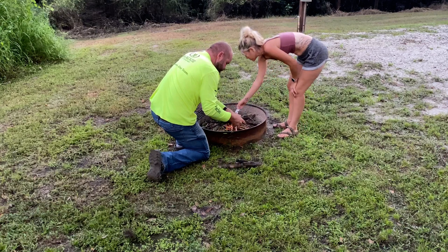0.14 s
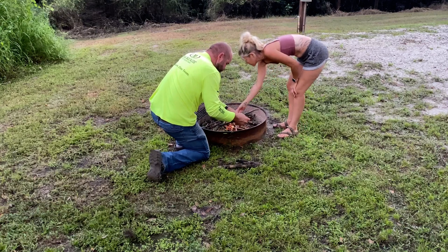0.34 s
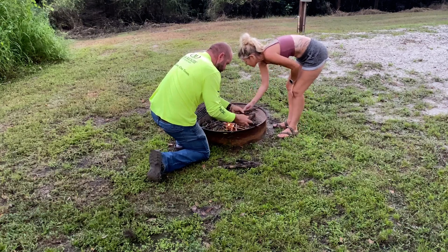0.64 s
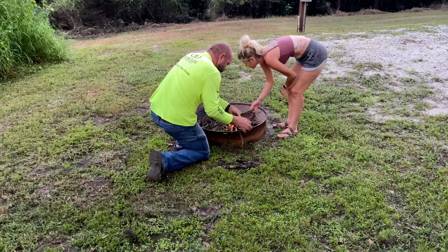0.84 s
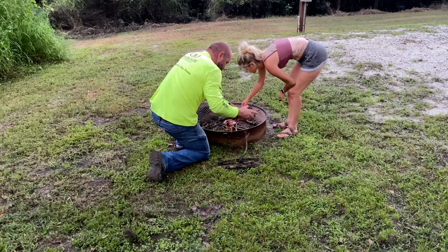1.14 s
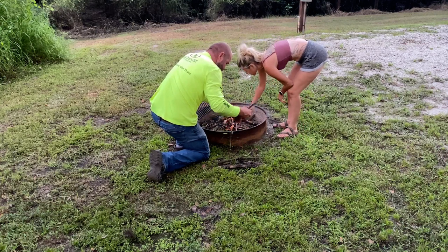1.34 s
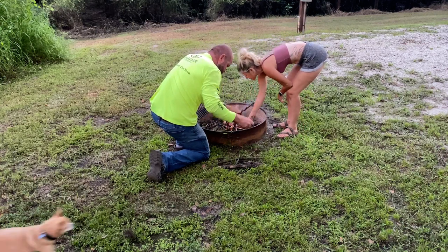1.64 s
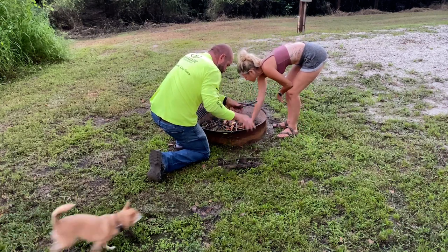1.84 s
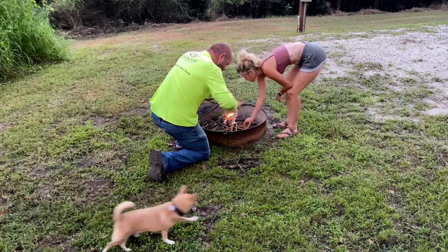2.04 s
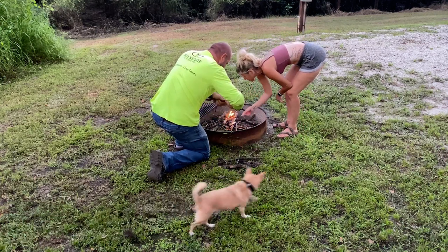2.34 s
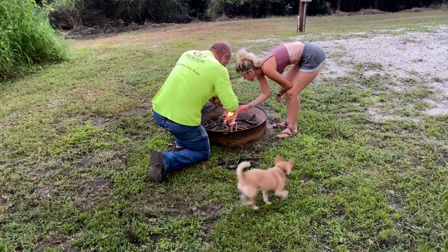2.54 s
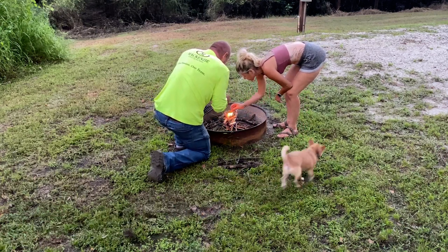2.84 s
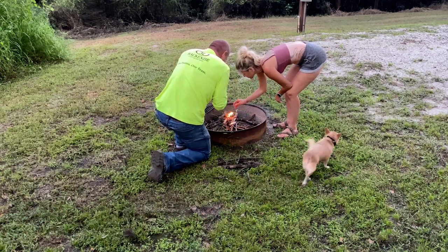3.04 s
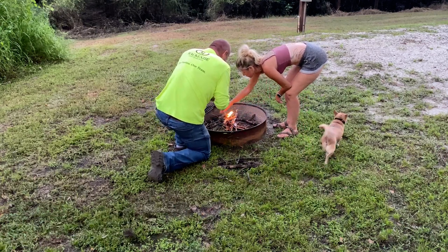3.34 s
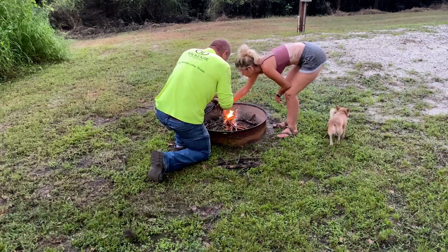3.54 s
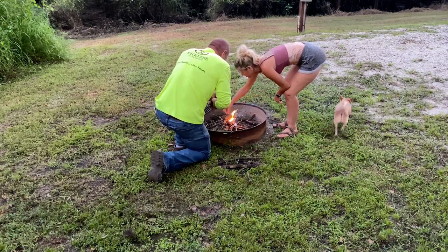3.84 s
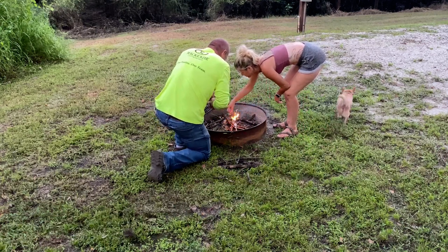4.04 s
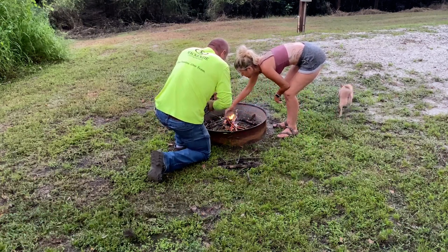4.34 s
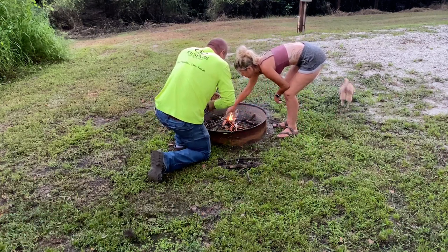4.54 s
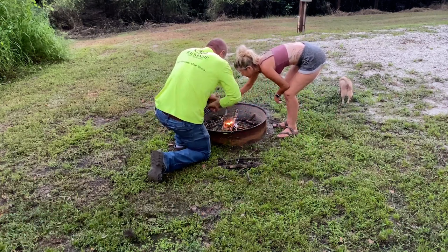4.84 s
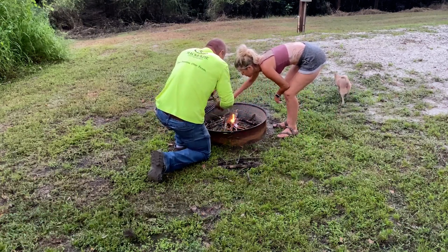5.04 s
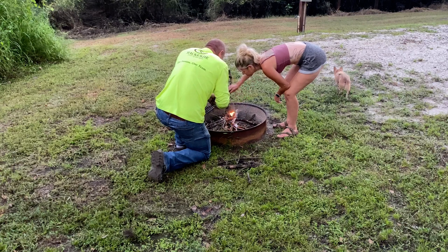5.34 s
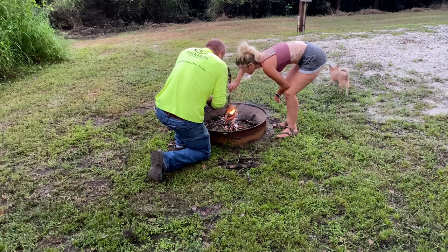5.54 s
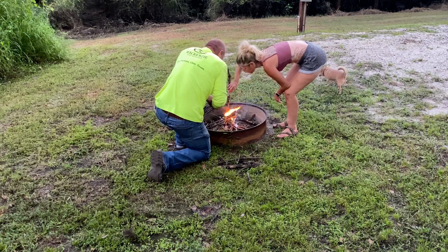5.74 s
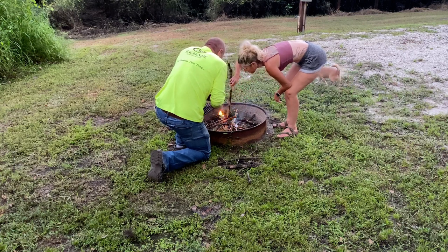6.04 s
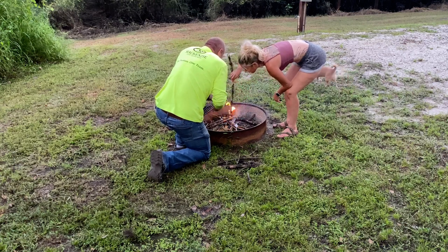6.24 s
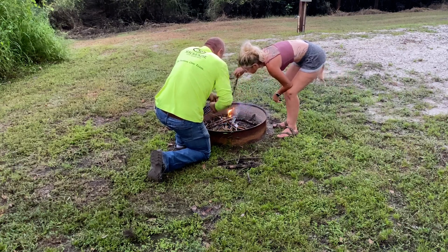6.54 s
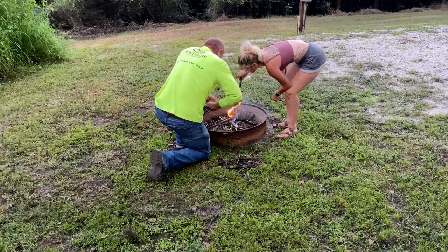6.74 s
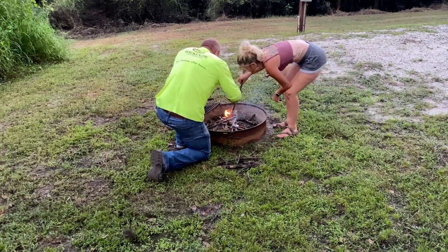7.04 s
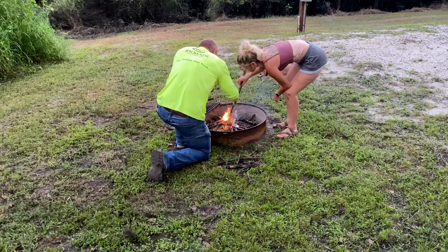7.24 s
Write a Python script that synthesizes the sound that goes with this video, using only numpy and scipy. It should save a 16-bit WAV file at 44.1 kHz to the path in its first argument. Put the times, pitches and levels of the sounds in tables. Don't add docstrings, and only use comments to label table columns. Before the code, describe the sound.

Outdoors at evening, a dense high insect chorus continues as hands rustle sticks at a small fire, with three loud wooden cracks.

```python
import sys
import numpy as np
from scipy import signal
from scipy.fft import rfft, irfft, next_fast_len
from scipy.io import wavfile

SR = 44100
rng = np.random.default_rng(int(sys.argv[2]) if len(sys.argv) > 2 else 0)


def master_out(mix):
    frames = np.transpose(np.atleast_2d(mix))
    ceiling = np.clip(frames, -1, 1)
    pcm = np.round(ceiling * 32767).astype(np.int16)
    wavfile.write(sys.argv[1], SR, pcm)


def volts_from_decibels(level):
    exponent = np.asarray(level, float) / 20
    return 10 ** exponent


N = 325281
TIME_S = np.arange(N) / SR
SIZE = next_fast_len(N + 4096)
HZ = np.arange(SIZE // 2 + 1) * SR / SIZE


def in_time(rows):
    at_s, level_db = np.transpose(rows)
    return np.interp(TIME_S, at_s, level_db)


def rms_one(x):
    return x / np.sqrt(np.mean(x ** 2) + 1e-20)


def drift(rate_hz):
    knots = rng.standard_normal(int(N / SR * rate_hz) + 2)
    return np.interp(TIME_S * rate_hz, np.arange(len(knots)), knots)


def colour(x, points):
    hz, level_db = np.transpose(points)
    log_gain = np.interp(np.log(HZ + 1), np.log(hz), level_db) * np.log(10) / 20
    cepstrum = irfft(log_gain, SIZE)
    cepstrum[1:SIZE // 2] *= 2
    cepstrum[SIZE // 2 + 1:] = 0
    return irfft(rfft(x, SIZE) * np.exp(rfft(cepstrum)), SIZE)[..., :N]


def resonance(x, hz, width_hz):
    r = np.exp(-np.pi * width_hz / SR)
    poles = [1, -2 * r * np.cos(2 * np.pi * hz / SR), r * r]
    return signal.lfilter([(1 - r * r) / 2, 0, (r * r - 1) / 2], poles, x)


def late(x, delay_s):
    return np.interp(np.arange(N) - delay_s * SR, np.arange(N), x)


def spread(pan_db):
    return volts_from_decibels(np.array([[pan_db / 2], [-pan_db / 2]]))


def field(points, alike, pan_db):
    shared, left, right = rng.standard_normal((3, N))
    pair = np.sqrt(alike) * shared + np.sqrt(1 - alike) * np.array([left, right])
    return rms_one(colour(pair, points)) * spread(pan_db)


def burst(start_s, t60_s, length=4096):
    at = round(start_s * SR)
    n = np.arange(min(length, N - at))
    return at + n, volts_from_decibels(-60 * n / SR / max(t60_s, 1e-3))


# start_s, level_db
TRAFFIC_LEVEL = [(0, -41.5), (.3, -45.5), (.95, -48.5), (1.9, -45.5), (3.4, -47.5), (4.6, -48), (7.0, -46),
                 (7.38, -46.5)]
# pitch_hz, level_db (per Hz)
RUMBLE_SPECTRUM = [(20, -47), (32, -33), (54, -7.5), (63, -14.5), (81, -0.5), (128, -2), (165, -11.5),
                   (220, -20), (250, -17), (330, -28), (420, -33), (600, -41.5), (900, -91.5)]


def distant_rumble():
    return volts_from_decibels(in_time(TRAFFIC_LEVEL) + 3.5) * field(RUMBLE_SPECTRUM, alike=0.96, pan_db=-1.1)


# pitch_hz, level_db (per Hz)
FAR_CHORUS_SPECTRUM = [(1700, -42.5), (2200, -37), (2600, -21), (3000, -17), (3800, -2), (4350, -9),
                       (5000, -10), (5600, -15), (7000, -25), (8500, -33.5), (9500, -43.5)]


def far_chorus(swell_db):
    chorus = volts_from_decibels(swell_db - 4.0) * field(FAR_CHORUS_SPECTRUM, alike=0.046, pan_db=-1.5)
    from_wall = np.array([late(chorus[0], .00776), late(chorus[1], .00757)])
    return chorus + volts_from_decibels(-6.5) * from_wall


# pitch_hz, width_hz, level_db (rms), pan_db (left-right)
FLANK_INSECTS = [(2805, 30, -69, -1.1), (2906, 38, -59, -5), (3026, 95, -51.1, -3.5), (3070, 48, -57.4, -8),
                 (3168, 89, -52.5, -3), (3313, 38, -55, -2.5), (3430, 58, -51, 10), (3570, 76, -45.4, -0.7),
                 (3670, 63, -45, -2.1), (3797, 52, -51, 9), (3830, 46, -49, -4.1), (3970, 57, -47.5, 3),
                 (4050, 95, -51, 15.8), (4170, 48, -52, -1.5), (4631, 66, -58, 4.5), (4750, 63, -53, 2.1),
                 (4931, 28, -55, 5), (5069, 250, -48, 7), (5270, 250, -53, 9), (5465, 300, -56.5, 2)]
# pitch_hz, width_hz, level_db (rms), pan_db
AHEAD_INSECTS = [(2654, 45, -62, -4.7), (2758, 41, -66, -6), (3256, 40, -56, -6), (3870, 60, -54, -5.5),
                 (4155, 30, -53.5, 7), (4314, 110, -54.5, 5), (4510, 139, -57, 10), (4570, 40, -54.5, -3),
                 (4720, 73, -53, 5), (4870, 57, -50.4, 7.5)]


def near_singers(clicks_per_s, waver_db):
    rows = [(*row, 115 * np.sign(row[3])) for row in FLANK_INSECTS]
    rows += [(*row, 2 * row[3]) for row in AHEAD_INSECTS]
    count = int(clicks_per_s * N / SR)
    out = np.zeros((2, N))
    for pitch_hz, width_hz, level_db, pan_db, lag_us in rows:
        clicks = np.bincount(rng.integers(0, N, count), rng.standard_normal(count), N)
        body = resonance(resonance(clicks, pitch_hz, width_hz), pitch_hz, width_hz)
        song = rms_one(body) * volts_from_decibels(level_db + waver_db * drift(0.934))
        out += spread(pan_db) * [song, late(song, lag_us * 1e-6)]
    return out


# start_s, level_db
CHORUS_SWELL = [(0, -35.5), (4.3, -34.5), (5.1, -34), (7.38, -34.5)]


def cicadas():
    swell_db = in_time(CHORUS_SWELL)
    near_gain = volts_from_decibels(swell_db - swell_db.mean() + 0.95)
    return near_gain * near_singers(clicks_per_s=3000, waver_db=2.5) + far_chorus(swell_db)


# start_s, level_db
BUSTLE_LEVEL = [(0, -68.5), (.4, -77), (1.8, -72.5), (2.3, -78), (3.1, -74), (3.5, -84), (4.3, -90),
                (5.05, -78), (6.3, -90), (6.7, -79), (7.38, -79)]
# pitch_hz, level_db (per Hz)
RUSTLE_SPECTRUM = [(300, -4), (450, 5.5), (700, -4), (1100, -2), (1600, -8), (2100, 0), (2800, -19.5)]


def rustle():
    level_db = in_time(BUSTLE_LEVEL) + 4.0 + 2.8 * drift(12)
    return volts_from_decibels(level_db) * field(RUSTLE_SPECTRUM, alike=0.11, pan_db=1.2)


# pitch_hz, level_db (per Hz)
HISS_SPECTRUM = [(5000, -42), (6500, 2), (8000, 6), (10000, 3.5), (12000, 0.5), (14000, 1.5), (15800, -6),
                 (16600, -32)]


def fire_hiss():
    flare_db, flare_s = 4, 0.11
    since_s = TIME_S - np.array(TEARING)[1:, :1]
    flare = np.max((since_s > 0) * np.exp(-np.abs(since_s) / flare_s), axis=0)
    level_db = -61 + flare_db * flare + 3 + .8 * drift(9)
    return volts_from_decibels(level_db) * field(HISS_SPECTRUM, alike=.93, pan_db=0)


# start_s, level_db (peak), pitch_hz, t60_s, pan_db (left-right)
KNOCKS_WITH_DECAY = [(0.028, -38.5, 330, 0.048, -9.5), (1.52, -44.5, 750, 0.018, 1), (3.5, -55, 290, 0.044, -5),
                     (4.649, -41.5, 740, 0.035, -3), (5.15, -58, 800, 0.034, -3), (1.23, -56, 1830, .04, 0),
                     (3.508, -50, 1860, 0.02, 0), (3.905, -52.5, 1900, .03, 0), (6.654, -58, 1200, 0.033, 0),
                     (6.672, -49, 1960, 0.032, 0), (3.693, -49, 1080, 0.052, 9), (.55, -60, 2000, .05, 0)]
# start_s, level_db (peak), pitch_hz, pan_db (left-right)
STICK_KNOCKS = [(0.017, -45, 1360, 9), (0.032, -48, 1050, 2), (0.277, -60, 1150, 4),
                (0.542, -53, 1790, 1.0), (0.567, -46, 1840, 8), (0.736, -52, 1150, 9),
                (0.752, -46, 2090, 0), (0.923, -46, 1190, -6), (1.389, -53, 980, 5), (1.475, -59, 1010, 9),
                (1.496, -54, 1146, -2), (1.517, -42, 2150, -7), (1.764, -45, 1950, 0.5),
                (1.884, -52, 764, -7), (2.787, -52, 1830, 0), (3.2, -57, 2360, 0.0),
                (3.507, -53, 2070, -1.0), (5.148, -55, 1100, 3), (5.15, -57, 2100, 0), (5.4, -60, 1200, 0),
                (6.471, -37.5, 2590, -9), (6.472, -50, 900, 0), (6.518, -48, 2310, 0.5),
                (6.662, -44.5, 1750, -7), (7.172, -53, 2400, 0.5)]


def knocks():
    knock_t60_s = 0.02
    rows = KNOCKS_WITH_DECAY + [(s, peak_db, hz, knock_t60_s, pan) for s, peak_db, hz, pan in STICK_KNOCKS]
    out = np.zeros((2, N))
    noise = rng.standard_normal((len(rows), 4096))
    for (start_s, peak_db, pitch_hz, t60_s, pan_db), draw in zip(rows, noise):
        at, fall = burst(start_s, t60_s)
        blow = fall * (1 - fall ** 2.0) * draw[:len(at)]
        ring = resonance(blow, pitch_hz, 200)
        ring = ring + 0.27 * resonance(blow, 0.63 * pitch_hz, 260)
        ring = ring - 0.2 * resonance(blow, 1.43 * pitch_hz, 440)
        out[:, at] += volts_from_decibels(peak_db + 1.5) * spread(pan_db) * ring / np.abs(ring).max()
    return out


# start_s, t60_s, grains_per_s, level_db
TEARING = [
    (0.0, 0.17, 3500, -53),
    (2.531, 0.14, 5400, -46.5),
    (3.63, .25, 4500, -49.5),
    (3.68, 0.14, 7500, -45),
    (4.648, 0.21, 6100, -41),
    (4.683, 0.2, 3700, -50),
    (6.47, 0.67, 1900, -56),
    (6.651, .1, 2000, -46.5),
]


def tears():
    out, chance = np.zeros(N), rng.random(N)
    sizes = volts_from_decibels(3.5 * rng.exponential(1, N).clip(0, 4)) * rng.choice([-1, 1], N)
    for start_s, t60_s, grains_per_s, level_db in TEARING:
        at, fall = burst(start_s, t60_s, length=16384)
        lets_go = chance[at] < grains_per_s / SR
        out[at] += volts_from_decibels(level_db + 21) * fall * sizes[at] * lets_go
    return out


# start_s, level_db (peak), middle_db, low_db (both relative), t60_s
LOUD_BREAKS = [
    (2.5247, -14, 2, -2, 0.0093),
    (2.5267, -25, 5.5, 5, 0.01),
    (3.6281, -19, -2.5, -4, 0.012),
    (3.6295, -21, -11, -3.5, 0.013),
    (4.6445, -8, -1, -7, 0.0067),
    (4.6462, -13, 2.5, -9, 0.0086),
    (4.6513, -19, -2, -1.5, .011),
    (4.6802, -19, 0, 4, 0.013),
]
# start_s, level_db (peak), middle_db, low_db (both relative)
THIN_SNAPS = [(0.0167, -39, 7, -5), (0.275, -41, -3, -3), (0.88, -38, -8, -3), (1.1736, -36, -2, -14),
              (1.223, -39, 6, -2), (1.5272, -36, -5, 1), (1.7933, -40, -14, -2), (2.032, -37, -5, -10),
              (2.093, -34.5, -10, -8), (2.1755, -34, -12, -5), (2.4004, -29, -7, -13),
              (2.4066, -37.5, -5, -6), (2.4633, -41, -5, 3), (2.4954, -35, -5, -3), (2.5047, -36, -6, -8),
              (3.6332, -32, 5, -4), (3.6404, -36, -5, -3), (3.6666, -28, -10, -14), (3.6795, -48, 11, -5),
              (3.685, -29, -4, -2), (4.571, -31, -10, -25), (6.4552, -36, 6, -18), (6.554, -38, 4, 1),
              (6.614, -35, 0, -1), (6.767, -43, 1, -7), (7.1764, -38, -5, 1), (7.3364, -42, 2, -3)]


def snaps():
    rows = [(*row, -12.0) for row in LOUD_BREAKS]
    rows += [(*row, 0.011, 5.0) for row in THIN_SNAPS]   # t60_s, very top dB
    bands = np.zeros((4, N))
    noise = rng.standard_normal((len(rows), 4096))
    for (start_s, peak_db, middle_db, low_db, t60_s, top_db), draw in zip(rows, noise):
        at, fall = burst(start_s + 0.00118, t60_s)
        band_db = np.array([[0], [middle_db], [low_db], [top_db]])
        bands[:, at] += volts_from_decibels(peak_db + 10.0 + band_db) * fall * draw[:len(at)]
    edges = [(8000, "high"), ((2400, 8000), "band"), (2400, "low"), (13000, "high")]
    out = np.zeros(N)
    for (hz, kind), band in zip(edges, bands):
        out += signal.sosfilt(signal.butter(3, hz, kind, fs=SR, output="sos"), band + 1e-18)
    return out


# pitch_hz, level_db (per Hz)
WOOD_SPECTRUM = [(300, -21.5), (600, -27.5), (1300, -14.5), (2500, -9.5), (4500, -1.5), (6500, -7.5),
                 (9000, -9.5), (12000, -8.5), (15500, -14), (17000, -41)]


def breaking_wood():
    return colour(snaps() + tears(), WOOD_SPECTRUM) * np.ones((2, 1))


# left_s, right_s (delays), level_db
YARD_ECHOES = [
    (.0012, .0012, -10),
    (.0120, .0116, -12),
    (.024, .021, -25),
]


def yard(pair):
    out = pair.copy()
    for left_s, right_s, level_db in YARD_ECHOES:
        out += volts_from_decibels(level_db) * np.array([late(pair[0], left_s), late(pair[1], right_s)])
    return out


# pitch_hz, lead_rad (of the right side)
PORT_LEAD = [(0, 0), (120, .5), (300, 1.05), (550, 3.1), (850, 5.1), (1300, 6.3), (1600, 6.9), (2000, 5.0),
             (2600, 6.4), (3600, 9.4), (4700, 12.4), (5500, 11.4), (6600, 12.6), (9100, 15.7),
             (11000, 18.85), (13150, 22.0), (15400, 25.1), (17000, 27.4)]


def through_ports(pair):
    lead = np.exp(1j * np.interp(HZ, *np.transpose(PORT_LEAD)))
    right = np.pad(pair[1], (0, 2048), "reflect")
    return np.array([pair[0], irfft(rfft(right, SIZE) * lead, SIZE)[:N]])


def scene():
    sticks = yard(knocks() + breaking_wood())
    front = distant_rumble() + rustle() + fire_hiss() + sticks
    return cicadas() + through_ports(front)


def roll_off(x):
    return signal.sosfilt(signal.butter(12, 16550, fs=SR, output="sos"), x)


def record(dry):
    return roll_off(dry)


dry = scene()
out = record(dry)
master_out(out)
```